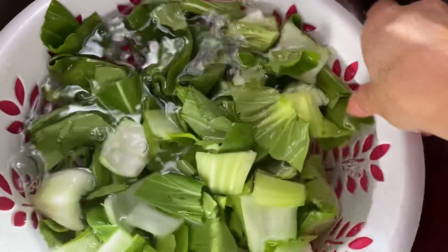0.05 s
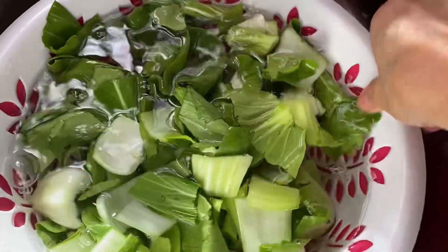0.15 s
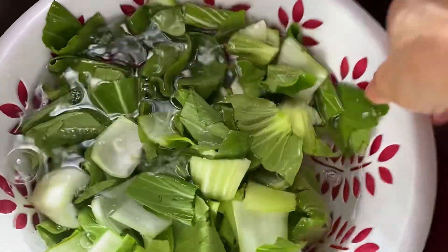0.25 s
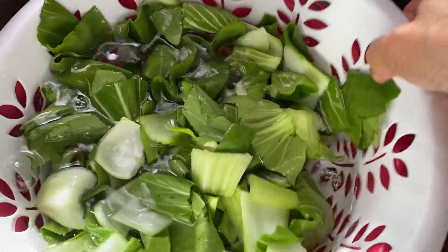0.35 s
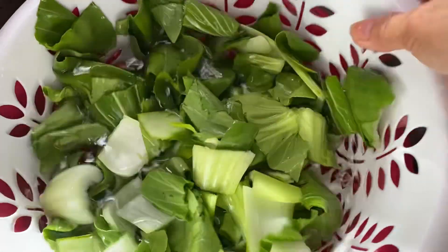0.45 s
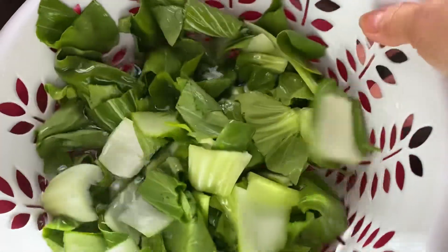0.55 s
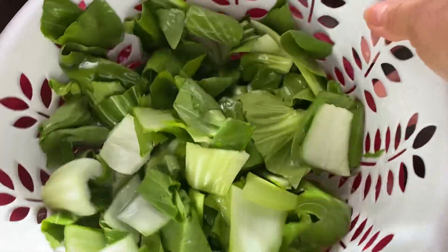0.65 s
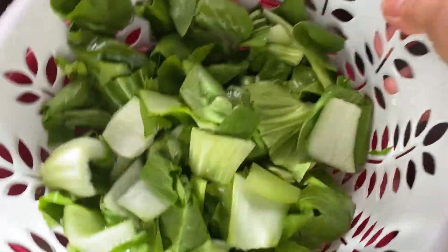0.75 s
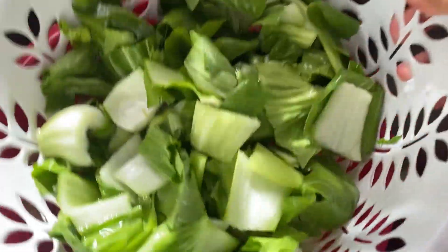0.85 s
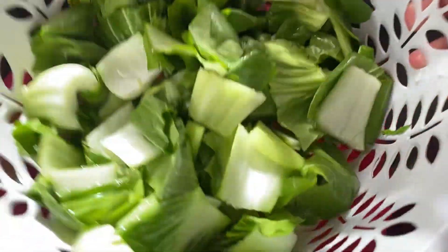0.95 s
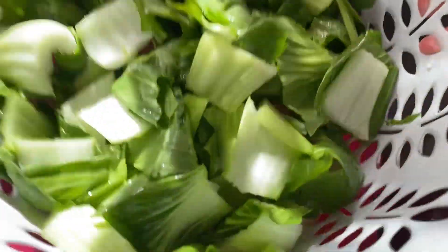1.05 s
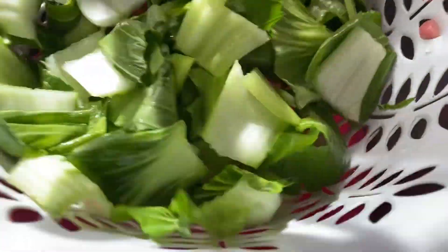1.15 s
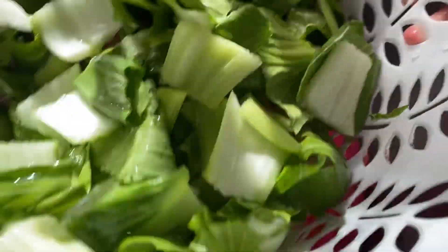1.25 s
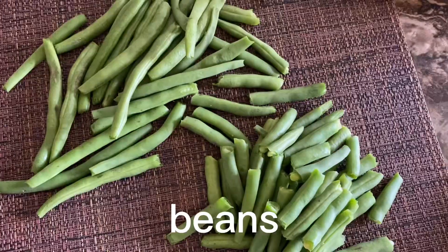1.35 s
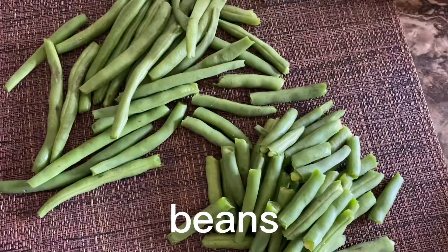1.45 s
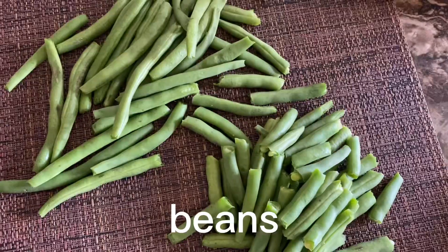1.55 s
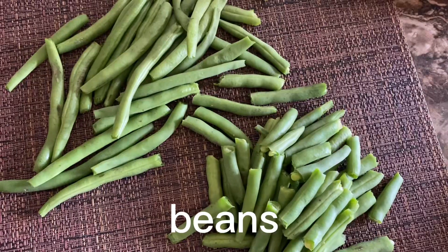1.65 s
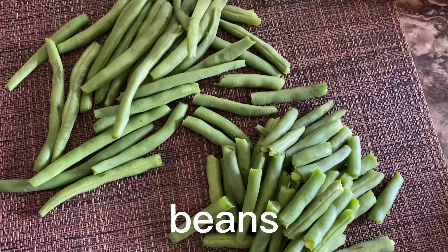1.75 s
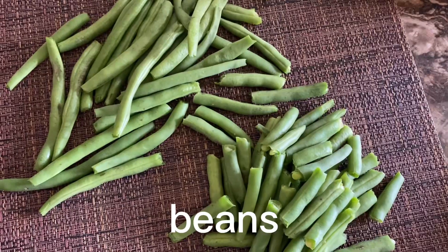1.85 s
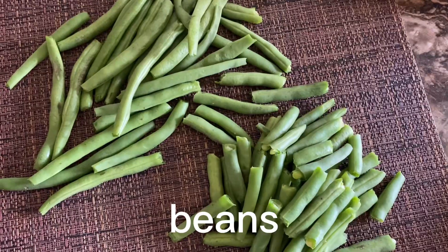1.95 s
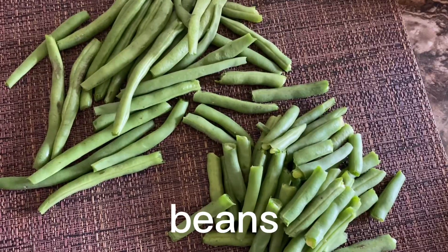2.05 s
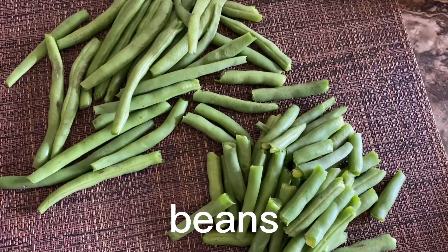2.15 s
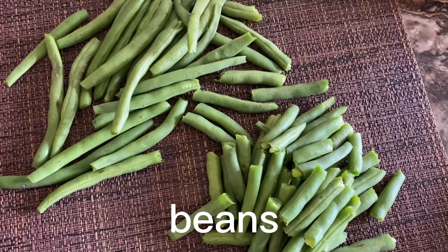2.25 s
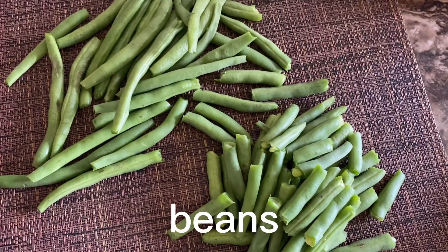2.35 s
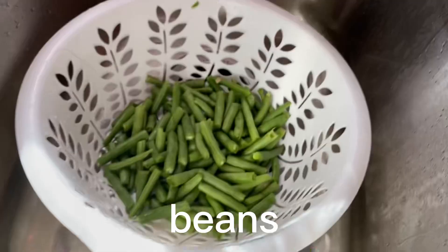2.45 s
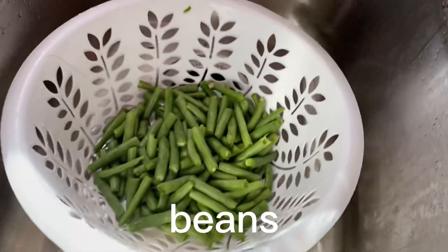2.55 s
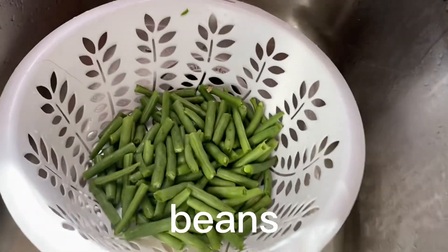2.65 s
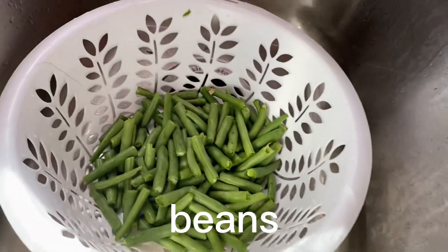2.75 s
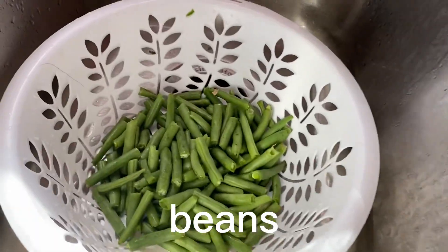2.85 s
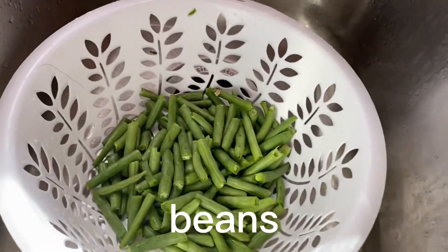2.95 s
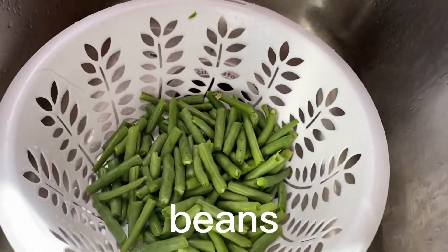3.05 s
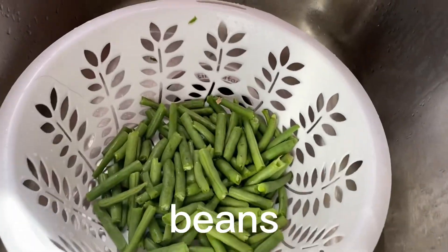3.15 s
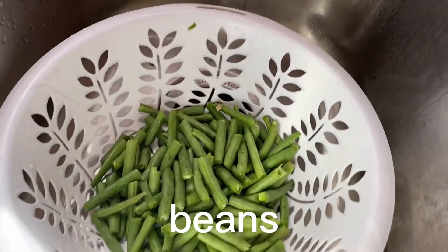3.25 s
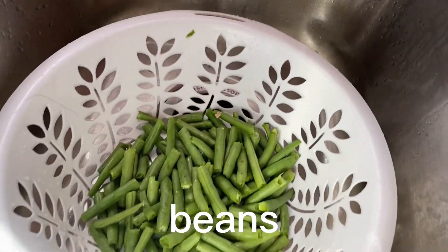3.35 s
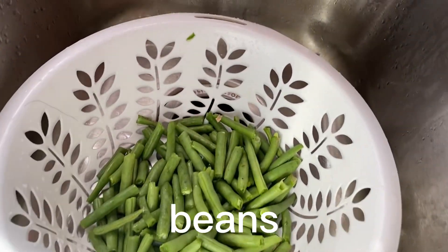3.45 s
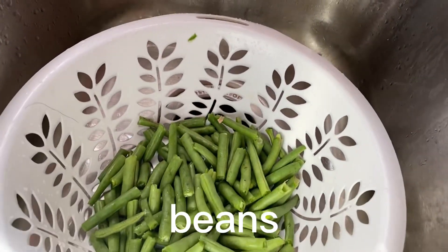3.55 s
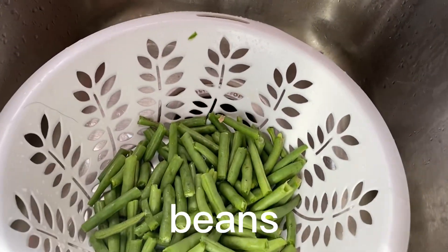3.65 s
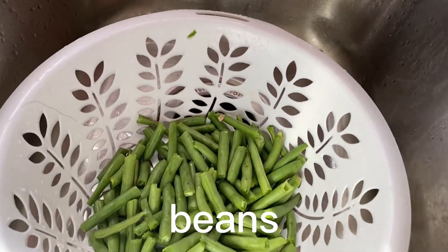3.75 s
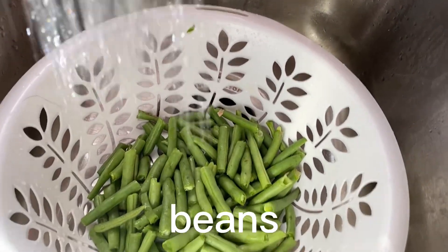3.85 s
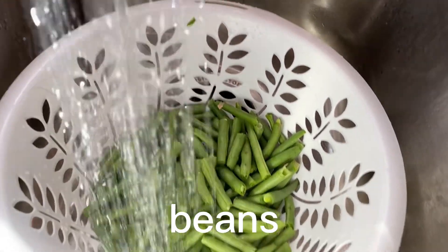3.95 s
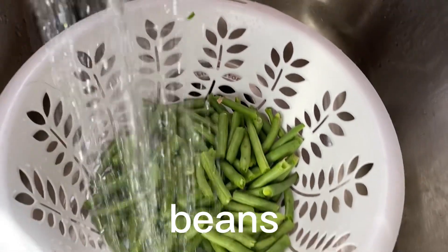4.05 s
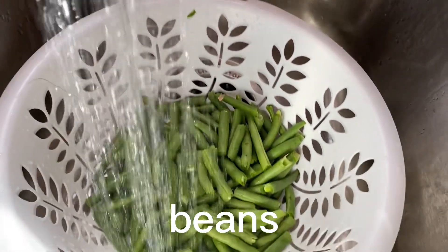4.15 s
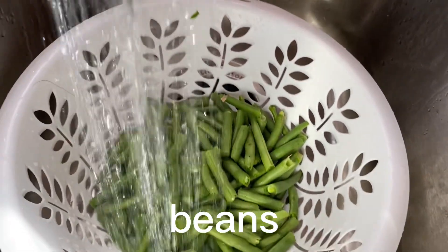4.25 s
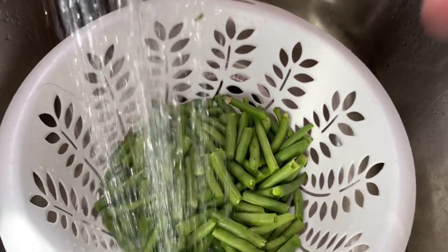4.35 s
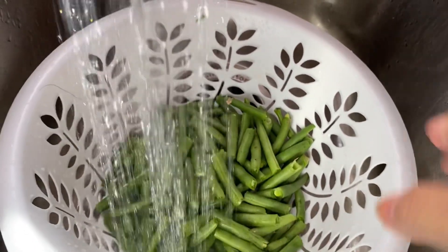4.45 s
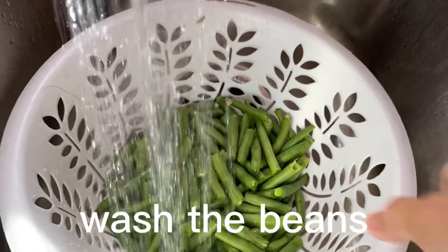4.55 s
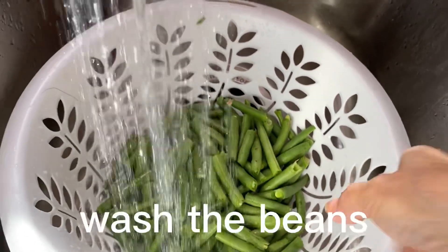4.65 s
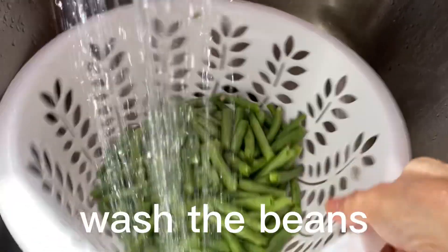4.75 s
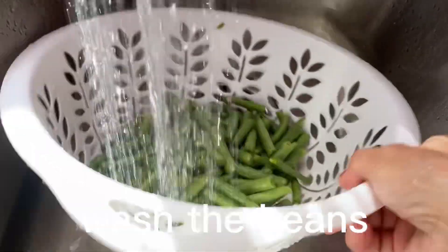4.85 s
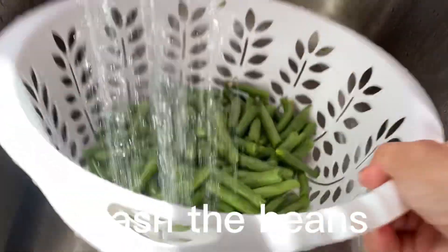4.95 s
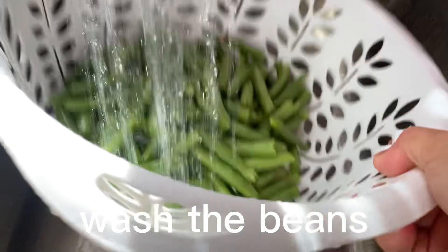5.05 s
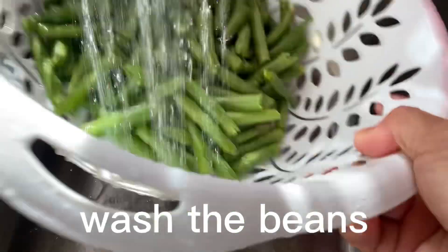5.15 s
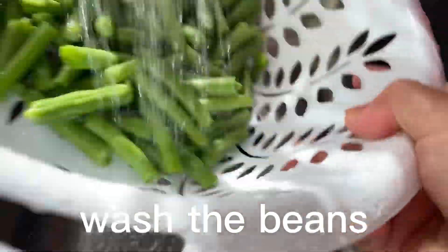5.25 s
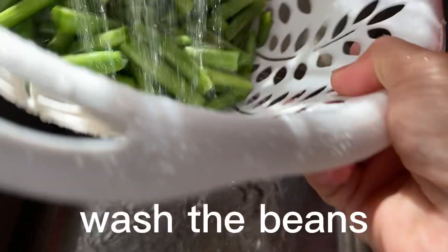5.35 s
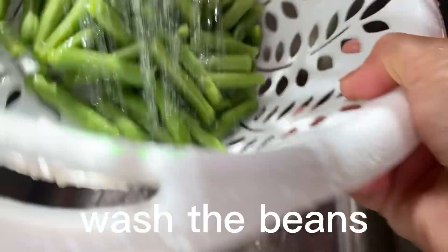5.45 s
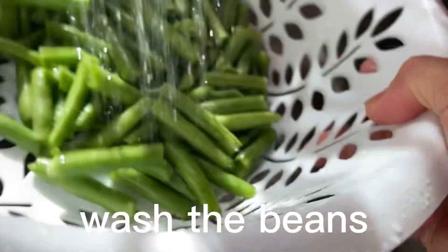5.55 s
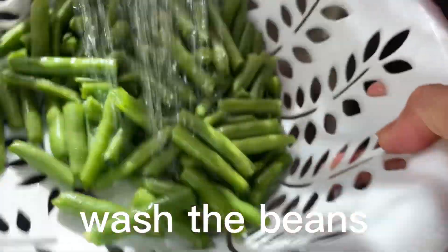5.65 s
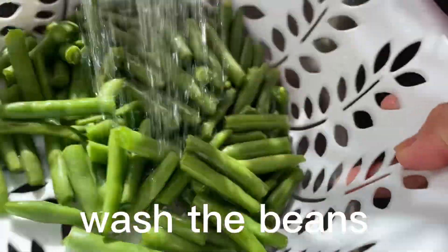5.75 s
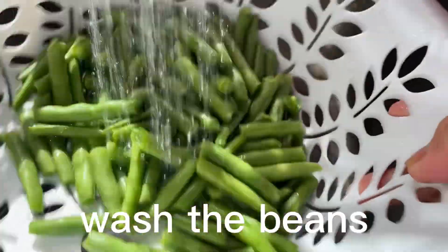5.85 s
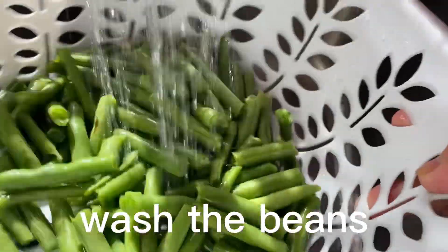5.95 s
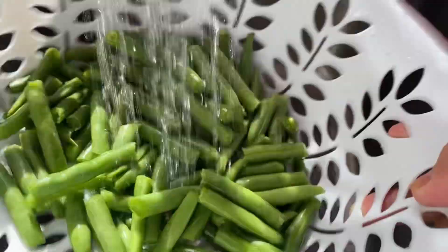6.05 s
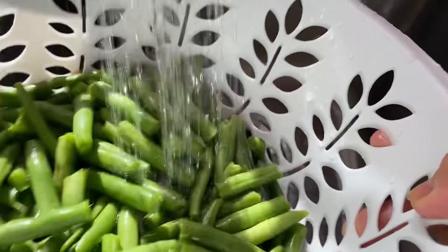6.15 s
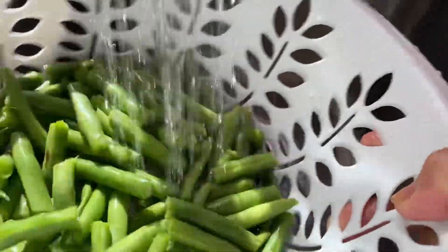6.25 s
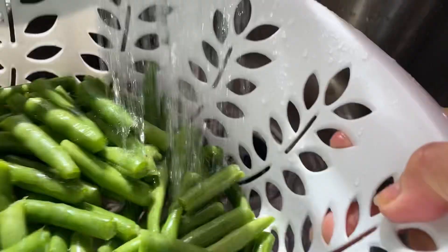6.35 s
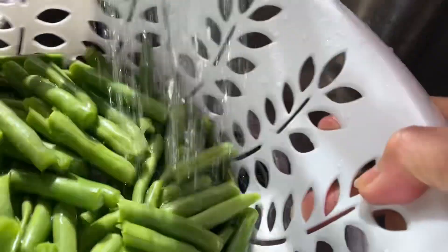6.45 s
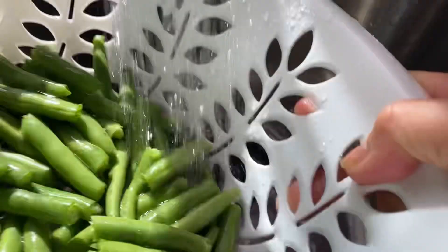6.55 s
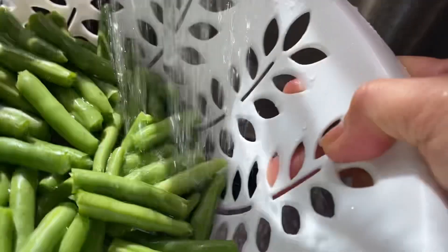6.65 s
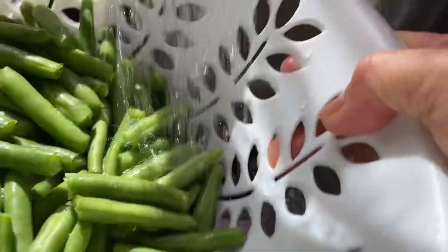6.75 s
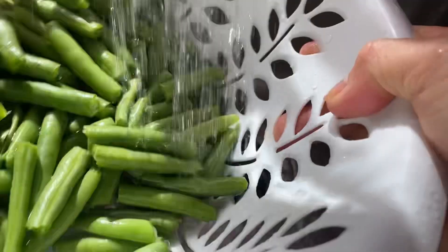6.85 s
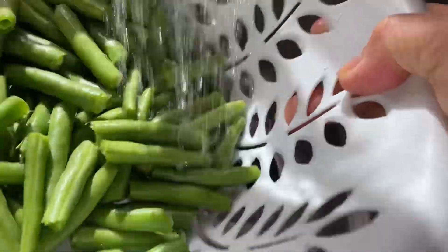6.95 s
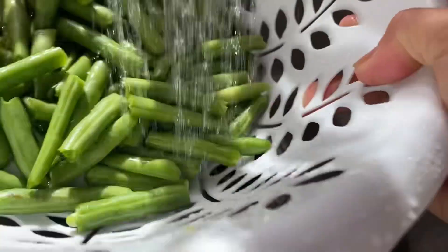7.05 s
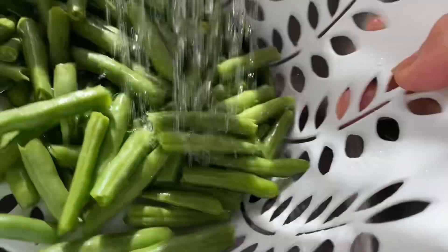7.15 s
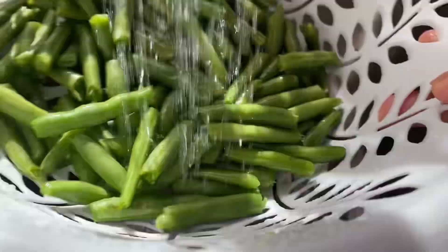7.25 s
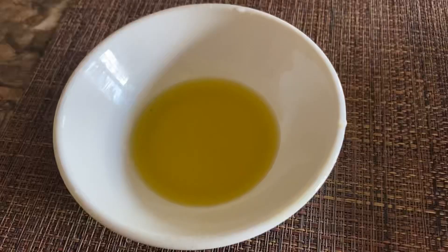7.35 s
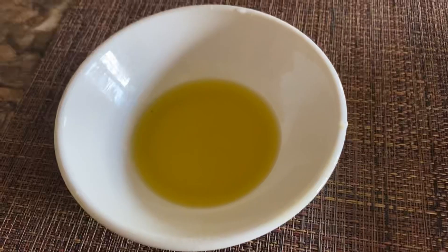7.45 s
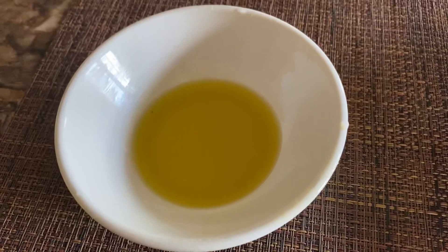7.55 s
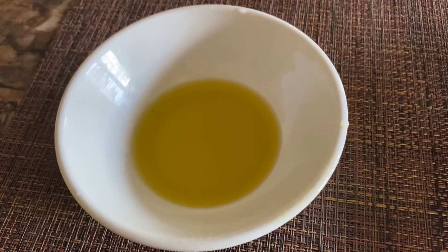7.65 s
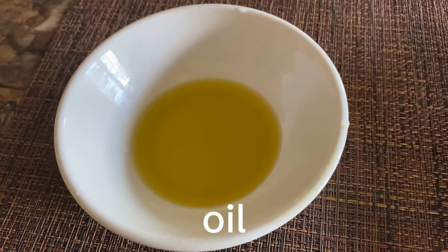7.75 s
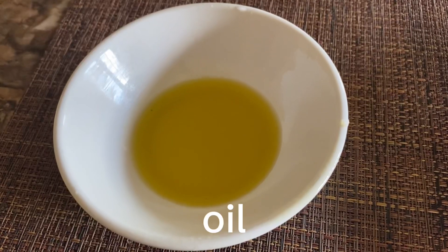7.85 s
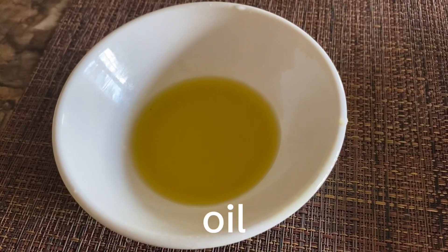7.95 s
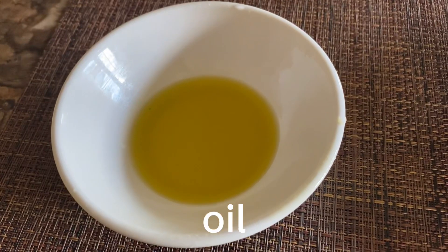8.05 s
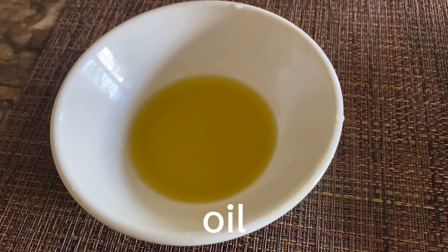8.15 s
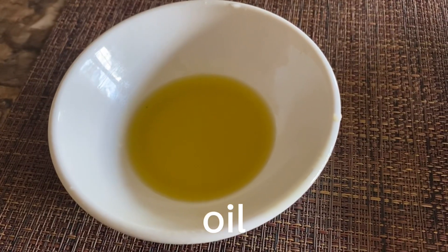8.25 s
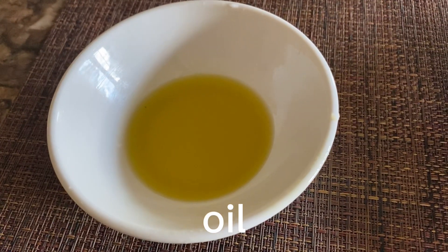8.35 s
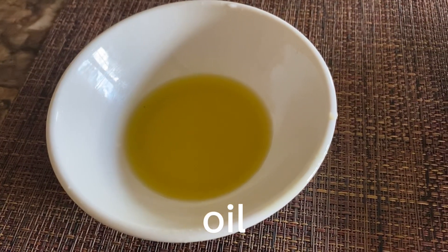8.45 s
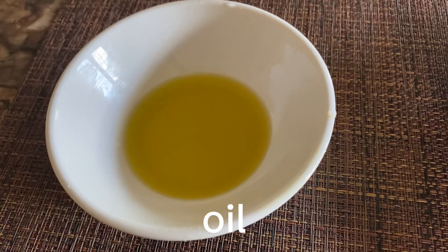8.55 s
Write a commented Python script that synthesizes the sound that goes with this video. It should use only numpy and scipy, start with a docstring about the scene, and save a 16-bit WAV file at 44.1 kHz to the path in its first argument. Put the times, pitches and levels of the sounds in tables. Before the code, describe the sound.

A low mains and refrigerator hum runs throughout, changing tone at each hard cut. From 0 to 0.8 s, a plastic colander gives dull soft thuds while wet leaves slosh and a few drops plink. From about 0.85 s it drains: trickling swells quickly, bubbly pitched gulps crowd together and deepen, peaking around 1.25 s, then cut at 1.35. Hum only, with a light crockery ping at 1.8 s. At 2.5 s the quieter sink room begins, with a slight rustle near 2.8 and faint hiss near 3.2. A tap valve thumps at 3.7, its pipe hissing; spray lands at 3.9 and builds fast. Plastic clacks at 4.5, then a hard steel knock at 4.76. Until 7.3 s, bright hiss sweeps over plastic, beans gurgle and splat, water drums on the basin, and duller knocks boom. It cuts abruptly to faint room hum until 8.5 s.

```python
"""A low kitchen hum comes first, with handled plastic and a trickle, as a colander of leaves is lifted from a bowl.
Four moments are cut one after the other. Drops and ringing air pockets drain from the colander; a dish, a few
damped modes, pings in the quiet room. At the steel sink a spray tap opens over beans: filtered impacts hiss and
drum, bubbles froth, and the colander knocks and is swirled under the jets. Then only the humming room is left."""
import sys
import numpy as np
from scipy import signal
from scipy.fft import rfft, irfft, next_fast_len
from scipy.io import wavfile
from scipy.ndimage import map_coordinates

SR = 44100
rng = np.random.default_rng(int(sys.argv[2]) if len(sys.argv) > 2 else 0)


def put_to_file(sound):
    """Save the sound as 16-bit audio at rate SR, in the file named by the first command-line argument."""
    columns = np.atleast_2d(sound).T  # one column per channel
    safe = np.clip(columns, -1, 1)
    whole_steps = np.round(safe * 32767)
    wavfile.write(sys.argv[1], SR, whole_steps.astype(np.int16))


N = 379252
LIFT_END, SINK_START, SINK_END = 1.349, 2.48, 7.311  # edges of the moments at the bowl and the sink [s]


def amp(db):
    """Decibels to gain."""
    return 10 ** (np.asarray(db) / 20)


def unit(x):
    """Scale to rms 1."""
    return x / np.sqrt(np.mean(x ** 2) + 1e-20)


def clock(length):
    """Sample times over a length in seconds."""
    return np.arange(round(length * SR)) / SR


def along(points, hz):
    """Interpolate (frequency [Hz], value) points on a log frequency axis."""
    f, v = np.transpose(points)
    return np.interp(np.log(hz + 1), np.log(f + 1), v)


def curves(rows):
    """One value per sample for each column after the time."""
    s, *cols = np.transpose(rows)
    return [np.interp(np.arange(N), s * SR, c) for c in cols]


def between(start, end):
    """1 from start to end, with edges of a few milliseconds."""
    t = clock(N / SR)
    return np.clip(np.minimum(t - start, end - t) / .004 + .5, 0, 1)


def ramp(start, length):
    """0 before start, rising evenly to 1 over a length in seconds."""
    return np.clip((clock(N / SR) - start) / length, 0, 1)


def swells(rows):
    """Bell-shaped rises of level, in dB."""
    t = clock(N / SR)
    return sum(db * np.exp(-((t - s) / half) ** 2) for s, half, db in rows)


def wobble(rate):
    """A smooth random curve, rate knots a second."""
    coarse = np.arange(0, N, 32)
    knots = rng.standard_normal(int(N * rate / SR) + 4)
    return np.interp(np.arange(N), coarse, map_coordinates(knots, [coarse * rate / SR]))


def filtered(x, response):
    """x times a response of frequency."""
    n = x.shape[-1]
    m = next_fast_len(n + 8192, True)
    return irfft(rfft(x, m) * response(np.fft.rfftfreq(m, 1 / SR)), m)[..., :n]


def coloured(x, spectrum):
    """x shaped by a spectrum, at rms 1."""
    return unit(filtered(x, lambda hz: amp(along(spectrum, hz))))


def burst(t, hz, octaves):
    """Noise of rms 1 centred on a frequency."""
    noise = rng.standard_normal(len(t))
    return unit(filtered(noise, lambda f: 1 / (1 + (np.log2((f + 1) / hz) / octaves) ** 2)))


def tone(hz, db, waver_db):
    """A motor tone that wavers slightly in level and pitch."""
    level = amp(db + waver_db * wobble(5))
    phase = 2 * np.pi * hz * clock(N / SR) + .55 * wobble(6)
    return level * np.sqrt(2) * np.sin(phase)


def add(track, s, sound):
    """Mix a sound in at time s."""
    part = track[max(round(s * SR), 0):][:len(sound)]
    part += sound[:len(part)]


def patter(rate, spread_db):
    """Impacts at random times and of random sizes, rms 1."""
    hits = np.flatnonzero(rng.random(N) < rate / SR)
    push, size = rng.standard_normal((len(hits), 2)).T
    return unit(np.bincount(hits, push * amp(spread_db * np.clip(size, -2, 2)), N))


def patchy(x, depth_db, width_hz, life):
    """Splashes come in clumps: each stretch of the spectrum flares and fades on its own."""
    hz, t, z = signal.stft(x, SR, nperseg=256)
    rows, cols = np.meshgrid(hz / width_hz, t / life, indexing="ij")
    knots = rng.standard_normal((int(rows.max()) + 3, int(cols.max()) + 3))
    field = np.clip(map_coordinates(knots, [rows, cols], order=2), -2, 2)
    return unit(signal.istft(z * amp(depth_db * field), nperseg=256)[1][:N])


def bubble(t, hz, cycles, rise):
    """An air pocket rings for some cycles, rising in pitch as it nears the surface."""
    age = t * hz / cycles
    glide = 1 + rise * age / (2 + age)
    return np.sin(2 * np.pi * hz * t * glide) * np.exp(-age) * (1 - np.exp(-t * hz))


def froth(start, end, count, hz, octaves, cycles, spread_db):
    """A cloud of small bubbles, randomly timed and pitched from start to end, rms 1."""
    t, n = clock(.02).astype(np.float32), round((end - start) * SR)
    when, size = rng.random((2, count, 1))
    pitch = hz * 2 ** (octaves * rng.standard_normal((count, 1)))
    pitch = np.clip(pitch, 600, 12000).astype(np.float32)
    loudness = amp(-spread_db * np.log(np.maximum(size, .02)))  # size is exponential in dB
    rings = loudness * bubble(t, pitch, float(cycles), rise=.05)
    places = (when * n).astype(int) + np.arange(len(t))
    cloud = np.zeros(N)
    add(cloud, start, unit(np.bincount(places.ravel(), rings.ravel())))
    return cloud


def ring(modes, soft_hz, attack):
    """A struck body of amplitude near 1; a soft contact spares the modes above soft_hz."""
    t, total = clock(0.76), 0
    for hz, db, t60 in modes:
        mode = amp(db - 60 * t / t60) * np.sin(2 * np.pi * hz * t + rng.normal(0, .5))
        total = total + mode / (1 + (hz / soft_hz) ** 4)
    return total * (1 - np.exp(-t / attack))


def echo(x, t60):
    """Diffuse reflections of the same energy as x."""
    t = clock(.4)
    tail = rng.standard_normal(len(t)) * amp(-60 * t / t60) * (t > .001)
    return signal.fftconvolve(x, tail / np.linalg.norm(tail))[:N]


# Air rumble at the bowl and near the dish, at the sink, and afterwards: (frequency [Hz], relative level [dB])
AIR_BOWL = [(20, -36), (35, -21), (52, -3.5), (85, -2.5), (160, -11), (330, -18.5), (450, -23.5),
            (1000, -29.5), (2200, -40.5), (3200, -42.5), (4500, -40.5), (6500, -60), (9000, -63.5),
            (15000, -63)]
AIR_SINK = [(20, -23.5), (48, 3), (95, -1), (160, -9.5), (300, -22), (500, -24), (1400, -31), (2200, -38),
            (4500, -36), (6500, -52.5), (11000, -54), (15000, -58.5)]
AIR_AFTER = [(20, -28), (55, 1), (90, -7), (280, -9), (420, -20), (1000, -26), (2200, -34.5), (4200, -35),
             (6500, -44), (9000, -52), (15000, -59)]
# Edges of the four moments: (time [s])
CUT_TIMES = [-1, LIFT_END, SINK_START, SINK_END, 10]
# The room from each listening place: (air level [dB], mains drone level [dB], drone throb [0-1],
# motor pitch [Hz], motor level [dB], strongest whine level [dB], left minus right [dB])
ROOM_SPOTS = [(-53.5, -39, 0.02, 460, -72, -77, -2), (-51, -51, 0.4, 398, -69, -77.5, -1.8),
              (-52, -59.5, .5, 780, -73, -79, 3), (-57.5, -67, .6, 791, -77.5, -81, -3.5)]
# Thin whines in each moment, strongest first: (pitch [Hz], ...)
WHINE_PITCHES = [
    [3774],
    [3772],
    [3892, 4484],
    [3960, 3564, 4580],
]
# Refrigerator tones heard everywhere: (pitch [Hz], level [dB rms])
FRIDGE_TONES = [(145, -64.5), (200, -68.5), (292, -71.5), (333.8, -75), (526, -77.5), (1135, -83),
                (1415, -83)]
# A soft rustle in the room: (time [s], half length [s], gain [dB])
ROOM_RUSTLE = [(2.81, 0.058, 7.5)]
MAINS_HZ, THROB_HZ = 58.7, 3.4
WHINE_STEP_DB, WHINE_WAVER_DB = 3, 2.2  # each whine is a step weaker than the one before; all waver in level


def room():
    """Air rumble, a refrigerator and a throbbing mains drone, heard from a new spot in each moment."""
    t = clock(N / SR)
    mains = np.sqrt(2) * np.sin(2 * np.pi * MAINS_HZ * t)
    beat = np.cos(2 * np.pi * THROB_HZ * t)
    out = sum(tone(hz, db, waver_db=2.5) for hz, db in FRIDGE_TONES)
    rustle_db = swells(ROOM_RUSTLE)
    colours = [AIR_BOWL, AIR_BOWL, AIR_SINK, AIR_AFTER]
    for start, end, colour, spot, pitches in zip(CUT_TIMES, CUT_TIMES[1:], colours, ROOM_SPOTS, WHINE_PITCHES):
        air_db, drone_db, throb, motor_hz, motor_db, whine_db, _ = spot
        air = amp(air_db + rustle_db) * coloured(rng.standard_normal(N), colour)
        drone = amp(drone_db) * (1 + throb * beat) * mains
        motor = tone(motor_hz, motor_db, waver_db=1)
        whine = sum(tone(hz, whine_db - WHINE_STEP_DB * k, waver_db=WHINE_WAVER_DB)
                    for k, hz in enumerate(pitches))
        out = out + (air + drone + motor + whine) * between(start, end)
    return out


POCKET_CYCLES, POCKET_SWELL_CYCLES = 9.5, 2.6  # how long a pocket rings, and how long it takes to close
SPLASH_DB = -21  # the tearing surface under each pocket's ring


def pocket(t, hz, rise, churn):
    """An air pocket closes with a small splash and rings; churning water blurs its pitch."""
    age = t * hz / POCKET_CYCLES
    clear = np.sqrt(1 - churn) * bubble(t, hz, POCKET_CYCLES, rise)
    blurred = np.sqrt(churn / 2) * burst(t, hz, octaves=0.16) * np.exp(-age)
    splash = amp(SPLASH_DB - 60 * t / .04) * burst(t, hz, octaves=.6)
    return (clear + blurred + splash) * (1 - np.exp(-(t * hz / POCKET_SWELL_CYCLES) ** 2))


# Colour of the crackling trickle: (frequency [Hz], relative level [dB])
TRICKLE_COLOUR = [(200, 2.5), (600, 2.5), (1300, 0.5), (2500, 3), (3400, 0.5), (4500, 2.5), (7000, 0.5),
                  (11000, 0.5), (15500, -0.5)]
# The leaves shift in the colander: (time [s], half length [s], gain [dB])
LEAF_SLOSHES = [(.25, 0.023, 6.5), (.49, 0.015, 6.5), (.59, 0.024, 13), (.875, 0.043, 9), (1.075, 0.024, 4),
                (1.172, 0.006, 4), (1.225, .014, 4), (1.285, 0.013, 5.5)]
# Air pockets ring in the bowl, first single drips, then a crowd of ever larger gulps:
# (time [s], level [dB], pitch [Hz], upward glide [share of the pitch])
BOWL_DRIPS = [(.254, -37, 1070, 0), (.645, -31, 1323, .08), (.683, -37.5, 1030, 0.095),
              (.684, -35, 2870, 0.057), (.703, -35, 1500, 0.17), (.857, -36.5, 1670, 0.18),
              (.882, -39.5, 2700, .1), (.964, -29, 1500, 0.02), (.971, -36, 2300, 0.18),
              (.987, -22.5, 2640, 0.18), (.99, -23.5, 1390, .25), (1.018, -23, 1286, 0.13),
              (1.026, -29, 2080, 0.12), (1.032, -35.5, 3200, .05), (1.042, -35.5, 1950, 0),
              (1.058, -36, 3000, .05), (1.094, -27.5, 3080, .06), (1.104, -32, 2280, 0),
              (1.113, -28, 4300, .1), (1.122, -30, 1440, .1), (1.124, -27.5, 1880, .02),
              (1.163, -22.5, 2290, .08), (1.164, -23, 4030, .1), (1.166, -30, 1450, .05),
              (1.174, -23.5, 1880, .04), (1.187, -27, 2300, 0), (1.197, -27.5, 1026, 0.087),
              (1.198, -24.5, 1865, .04), (1.203, -22.5, 1470, .05), (1.205, -19.5, 1170, .08),
              (1.212, -24.5, 2020, .05), (1.22, -23.5, 948, 0.0046), (1.226, -19, 1604, .04),
              (1.236, -23.5, 910, 0.013), (1.254, -16.5, 2510, 0.085), (1.257, -22.5, 660, .03),
              (1.261, -21.5, 925, .1), (1.275, -26, 1440, .04), (1.277, -17.5, 660, .02),
              (1.279, -24.5, 930, 0), (1.285, -23, 2650, .04), (1.289, -21, 2205, .03),
              (1.291, -22, 1314, .03), (1.297, -27, 885, 0.01), (1.313, -25.5, 943, .03),
              (1.315, -29, 1620, 0.081), (1.323, -17, 613, .02)]
# The trickle, before its mix gain, holds until the lift, swells to a crest and ebbs
TRICKLE_DB, CREST_DB, LIFT_S, CREST_S, EBB_DB_PER_S = -65, -38, 0.85, 1.235, 50.5
SEATED_S, POUR_S = .61, 1.09  # the colander leaves the water; its trickles join into streams
CHURN_ALONE, CHURN_CROWDED = .02, .12  # share of a pocket's ring that is blurred by its neighbours
PATCH_DB = 3.2  # depth of the clumps in falling water


def draining():
    """Water trickles from the rising colander, swells to a crest and ebbs, and gulps as air gets under it."""
    t = clock(.15)
    ebb_db = EBB_DB_PER_S * np.maximum(clock(N / SR) - CREST_S, 0)
    flow_db = TRICKLE_DB + (CREST_DB - TRICKLE_DB) * ramp(LIFT_S, CREST_S - LIFT_S) - ebb_db
    flow_db = flow_db + swells(LEAF_SLOSHES) + 2.0 * wobble(55.23)
    drops = patchy(patter(rate=7000, spread_db=4.5), depth_db=PATCH_DB, width_hz=800, life=.014)
    crackle = coloured(drops, TRICKLE_COLOUR)
    pouring = ramp(POUR_S - .04, 0.091)  # falling streams drive air into the bowl
    bubbles = froth(0, LIFT_END, count=1300, hz=2197, octaves=.6, cycles=11, spread_db=4.5)
    water = amp(flow_db + 5) * (amp(-1.2 * pouring) * crackle + amp(-8 + 1.2 * pouring) * bubbles)
    slosh = coloured(rng.standard_normal(N), [(60, -6), (110, 10.5), (170, 1), (250, 0.0), (600, -1.0),
                                              (900, -15.5), (2000, -23), (6000, -46)])
    # while the colander still sits in the bowl
    water += amp(-52 + 5.7 * wobble(29.7)) * slosh * between(-1, SEATED_S)
    for s, db, hz, rise in BOWL_DRIPS:
        churn = CHURN_CROWDED if s > POUR_S else CHURN_ALONE
        add(water, s, amp(db) * pocket(t, hz, rise, churn))
    return water + amp(-13.5) * echo(water, t60=0.231)


# The plastic colander is bumped and handled: (time [s], level before the thud's trim [dB], pitch [Hz])
PLASTIC_BUMPS = [(.057, -32.5, 233), (.215, -28, 475), (.231, -29.5, 394), (0.275, -32, 213),
                 (.318, -39.5, 718), (.323, -32, 325), (.402, -35.5, 756), (.403, -24.5, 253),
                 (.418, -29.5, 265), (.49, -38, 306), (.582, -32.5, 218), (.592, -33, 600),
                 (4.514, -21, 440), (4.519, -14, 365.3), (4.524, -24.5, 596), (4.555, -21.5, 351),
                 (4.568, -25.5, 100), (4.665, -20.5, 170), (4.72, -20, 331), (6.372, -25, 60)]
THUD_NOISE_DB = -5  # the dull puff under each thud's note


def bumps():
    """Dull, brief thuds of the plastic: a decaying note over a puff of noise."""
    out, t = np.zeros(N), clock(.15)
    for s, db, hz in PLASTIC_BUMPS:
        noise = rng.standard_normal(len(t))
        puff = unit(filtered(noise, lambda f: 1 / (1 + (np.log2((f + 1) / hz) / .6) ** 4)))
        note = np.sqrt(2) * np.sin(2 * np.pi * hz * t)
        envelope = amp(db - 10.5 - 60 * t / 0.18) * (1 - np.exp(-t / 0.0013))
        add(out, s, envelope * (amp(THUD_NOISE_DB) * puff + note))
    return out


# Single drops that hit the plastic: (time [s], level before the drop's trim [dB], centre [Hz])
PLASTIC_DROPS = [(.193, -38, 1100), (.193, -32, 2820), (.26, -47, 8000), (.353, -38, 3700),
                 (0.401, -32, 2080), (.492, -49, 7000), (0.601, -35.5, 2870), (0.659, -43, 8500),
                 (.6828, -35.5, 1560), (.8, -36.5, 8850), (.87, -40, 7000), (.927, -39, 5500),
                 (.993, -32, 11000), (1.063, -29.5, 6000), (1.119, -28, 4600), (1.145, -28, 6200),
                 (1.163, -24, 6000), (1.175, -24.5, 5000), (1.21, -21, 5800), (1.226, -17.5, 8000),
                 (1.256, -18.5, 8000), (3.917, -33, 8000), (3.951, -22, 9000), (3.981, -17, 12000),
                 (4.1505, -13.5, 14000), (4.331, -17, 11000), (4.356, -14, 13500), (4.363, -10, 10300),
                 (4.4, -16, 10700), (4.504, -13, 10000), (4.541, -11.5, 8560), (4.5527, -11.5, 12970),
                 (4.574, -23, 2240), (4.612, -12, 9600), (4.671, -14.5, 9100), (5.04, -12, 10900),
                 (5.4723, -8.5, 6420), (5.618, -15, 9000), (5.632, -14.5, 6710), (5.724, -17, 6670),
                 (5.849, -18, 9000), (5.981, -15.5, 7000), (6.009, -13, 10500), (6.022, -15.5, 6300),
                 (6.104, -11.5, 10280), (6.162, -16.5, 7000), (6.2495, -18, 3980), (6.288, -15.5, 11000),
                 (6.443, -14.5, 9000), (6.6077, -13, 8100), (6.737, -12, 8100), (6.872, -17, 7500),
                 (7.094, -17, 7040), (7.102, -13, 11000), (7.182, -15, 10900), (7.2694, -14, 7500)]


def drops_on_plastic():
    """Sharp noise bursts; smaller drops are brighter and briefer."""
    out, t = np.zeros(N), clock(.06)
    for s, db, hz in PLASTIC_DROPS:
        t60 = 0.023 * np.sqrt(6000 / hz)
        add(out, s, amp(db - 5.5 - 60 * t / t60) * burst(t, hz, octaves=0.63))
    return out


# Modes of the crockery: (frequency [Hz], relative level [dB], 60 dB decay [s])
DISH_MODES = [(2138, 0, 0.1), (2143, -12, 0.29), (2220, -14, .08), (5180, -14.5, 0.08), (5600, -22, 0.05),
              (7980, -18, 0.076), (9170, 2.5, 0.024), (9230, -9, 0.068), (10750, -16, .04),
              (11280, -19, 0.046), (12850, -20, .04)]
DISH_S = 1.8028
CRACK_DB = -48  # the dry tick of the contact
DISH_ROOM_DB, DISH_ROOM_T60_S = -17, .3


def dish():
    """A light tap on crockery: modes ring with a dry tick, and the room answers."""
    ping = np.zeros(N)
    add(ping, DISH_S, amp(-34.5) * ring(DISH_MODES, soft_hz=18000, attack=0.00039))
    t = clock(.02)
    add(ping, DISH_S, amp(CRACK_DB - 60 * t / 0.013) * burst(t, hz=6500, octaves=1.1))
    return ping + amp(DISH_ROOM_DB) * echo(ping, t60=DISH_ROOM_T60_S)


# A faint, high hiss before the tap opens: (time [s], half length [s], level [dB])
HISS_BEFORE_TAP = (3.2, 0.24, -72)


def faint_hiss():
    """A brief, soft hiss at the sink: filtered noise under a bell-shaped envelope."""
    s, half, db = HISS_BEFORE_TAP
    hiss = coloured(rng.standard_normal(N), [(1000, -3), (5000, 0), (8000, -5), (15000, -4)])
    return hiss * amp(db) * np.exp(-((clock(N / SR) - s) / half) ** 2)


# Modes of the pipe: (frequency [Hz], relative level [dB], 60 dB decay [s])
VALVE_MODES = [(124.3, 0, 0.9), (215, -12, 0.31), (291.3, -13, 0.27), (409, -13.5, 0.23), (526, -19, 0.14)]
# Colour of the pipe's hiss: (frequency [Hz], relative level [dB])
PIPE_COLOUR = [(100, 24), (340, 21), (415, 27), (500, 11.5), (900, 6), (2000, 3), (2330, 10), (2700, -1),
               (4300, 1), (5200, 4), (5900, -4), (6700, -1.5), (11000, -4.5), (15000, -9)]
VALVE_S, JETS_S, BUILD_S, BUILD_DB = 3.675, 3.91, 0.099, 12.5  # the tap opens, the jets land and build to full flow


def tap():
    """The valve thumps as it opens and the pipe hisses ever louder until the jets land."""
    pipe = np.zeros(N)
    add(pipe, VALVE_S, amp(-21.5) * ring(VALVE_MODES, soft_hz=903, attack=0.0041))
    pipe *= amp(-14 * between(3.755, SINK_END))  # flowing water damps the pipe
    t = clock(.06)
    spurt = amp(-48.5 - 60 * t / 0.059) * burst(t, hz=2400, octaves=1.8)
    add(pipe, VALVE_S - .006, spurt)
    hiss = coloured(rng.standard_normal(N), PIPE_COLOUR) * amp(-47 + 4.2 * ramp(VALVE_S, JETS_S - VALVE_S))
    return pipe + hiss * ramp(VALVE_S - .045, 0.059) * between(SINK_START, JETS_S + BUILD_S)


# Runoff drumming on the basin, at full flow: (time [s], level [dB])
RUNOFF_LEVEL = [(4.0, -43), (4.7, -38), (4.9, -37), (5.02, -43), (5.22, -40.5), (5.52, -38.5),
                (6.73, -36.5), (7.0, -40), (7.3, -40.5)]
# The jets sweep over bare plastic and hiss louder: (time [s], half length [s], gain [dB])
JET_SWEEPS = [(5.485, 0.02, 2.5), (5.66, 0.051, 4), (6.12, 0.045, 2.5), (6.32, 0.095, 4.5),
              (6.495, 0.025, 9), (6.765, 0.07, 4.5), (6.9, .02, 4.5), (7.09, 0.015, 7), (7.295, 0.0093, 1)]
JET_DB = -36.5  # base of the hiss, before its mix gain
# gurgle of the beans at rest, and once picked up, before its mix gains
STILL_DB, TUMBLE_DB, PICKUP_S, SETTLE_DB_PER_S = -41.5, -36.5, 4.72, 1.5


def spray_levels():
    """Levels in dB of hiss, gurgle and drumming: the flow builds and holds; picked-up beans tumble, then settle."""
    flow_db = BUILD_DB * (ramp(JETS_S, BUILD_S) - 1)
    held = ramp(PICKUP_S, 0.055)
    settling_db = SETTLE_DB_PER_S * np.maximum(clock(N / SR) - PICKUP_S, 0)
    tumble_db = TUMBLE_DB - settling_db + 1.6 * wobble(22)
    hiss_db = JET_DB + swells(JET_SWEEPS) + 0.58 * wobble(20)
    gurgle_db = STILL_DB + held * (tumble_db - STILL_DB)
    drum_db = curves(RUNOFF_LEVEL)[0] + 1.4 * wobble(16)
    return flow_db + hiss_db, flow_db + gurgle_db, flow_db + drum_db


# The colander is in a new place at each of these: (time [s])
MOVE_TIMES = [0, 4.7, 5.0, 5.3, 5.7, 6.1, 6.5, 6.9, 7.3]
WALLS_DB, WALLS_T60_S = -10, .04  # the steel walls close around the jets


def walled(x):
    """Close reflections comb the sound; the pattern shifts as the colander moves."""
    t = clock(N / SR)
    shares = [np.sqrt(np.interp(t, MOVE_TIMES, place)) for place in np.eye(len(MOVE_TIMES))]
    return unit(x + amp(WALLS_DB) * sum(share * echo(x, WALLS_T60_S) for share in shares))


# Colours of the jets, the wet beans and the basin: (frequency [Hz], relative level [dB])
JET_COLOUR = [(300, -7), (900, -9.5), (2000, -12), (3500, -2), (6500, -3.5), (11000, -0.5), (15500, -2)]
GURGLE_COLOUR = [(400, -16), (800, -3), (1400, 1.5), (2900, 1), (4500, -10.5), (7000, -25.5),
                 (12000, -40.5)]
BASIN_COLOUR = [(35, -52), (60, -36), (92, -18), (134, -10), (166, -12.5), (204, -1), (238, -3), (280, -7),
                (380, -9), (486, -15.5), (591, -15.5), (800, -30.5), (1040, -59), (1760, -120)]
# Modes of the steel sink, also struck in knocks(): (frequency [Hz], relative level [dB], 60 dB decay [s])
SINK_MODES = [(79, -22.5, 0.22), (155.5, -17, 0.33), (202.2, -8, 0.5), (216.2, -14.5, 0.74),
              (242.6, -7, .2), (278.4, 1, 0.16), (337.4, -3, 0.15), (377.7, -10, 0.26), (450, -19, 0.23),
              (522.5, -1, 0.16), (586, -13, 0.55), (675, -26, 0.38), (872, -27.5, .25), (1046, -19, .1),
              (1177, -22, .1), (1244, -22, 0.2), (2714, -19, .12)]


def spray():
    """Jets hiss on the colander, froth among the beans and drum on the basin."""
    hiss_db, gurgle_db, drum_db = spray_levels()
    swirl = ramp(PICKUP_S, 0.303)  # tumbling beans open gaps that trap air
    streams = patchy(patter(rate=16000, spread_db=4.0), depth_db=PATCH_DB, width_hz=426.3, life=.018)
    jets = coloured(walled(streams), JET_COLOUR) * amp(hiss_db + 5 + 1.5 * wobble(170))
    fine_bubbles = froth(3.9, SINK_END, count=1500, hz=8015, octaves=.25, cycles=24, spread_db=4.0)
    fizz = amp(hiss_db - 6.5) * fine_bubbles
    trickles = patchy(patter(rate=3500, spread_db=1.0), depth_db=PATCH_DB, width_hz=260, life=.02)
    wash = coloured(trickles, GURGLE_COLOUR) * amp(0.84 * wobble(70))
    bubbles = froth(3.9, SINK_END, count=2000, hz=2607, octaves=.45, cycles=9, spread_db=2.2)
    beans = amp(gurgle_db) * (amp(-3.5) * wash + amp(-10.5 + 4.1 * swirl) * bubbles)
    runoff = patter(rate=980, spread_db=0.0)
    steel = unit(signal.fftconvolve(runoff, ring(SINK_MODES, soft_hz=289.0, attack=0.0007))[:N])
    basin = coloured(patter(rate=900, spread_db=1.0), BASIN_COLOUR)
    drum = amp(drum_db) * (amp(-1) * basin + amp(-5.5) * steel)
    fat_drops = coloured(patter(rate=120, spread_db=1.5), GURGLE_COLOUR)
    spatter = amp(gurgle_db - 11) * fat_drops  # they slap the beans
    return (jets + fizz + spatter + beans + drum) * between(3.915, SINK_END)


# The colander meets the sink: (time [s], level [dB], hardness as cut-off [Hz])
SINK_KNOCKS = [(4.764, -7, 2500), (4.786, -19, 300), (5.423, -21, 280), (5.47, -20.5, 280),
               (5.764, -22.5, 280), (6.08, -21.5, 205), (6.2, -25, 210), (6.492, -16, 245),
               (6.63, -27.5, 300), (6.675, -22, 270), (6.738, -14.5, 240), (6.787, -19.5, 220),
               (6.868, -24, 340), (7.143, -22.5, 220)]


def knocks():
    """The colander strikes the sink, which booms in its low modes."""
    out = np.zeros(N)
    for s, db, hz in SINK_KNOCKS:
        add(out, s, amp(db) * ring(SINK_MODES, soft_hz=hz, attack=0.0024))
    t, hardest = clock(.3), SINK_KNOCKS[0][0]
    jolt = amp(-21.5 - 60 * t / 0.17) * burst(t, hz=1360, octaves=1.43)
    add(out, hardest, jolt)  # the hardest blow jolts the beans
    shake = amp(-23.0 - 60 * t / 0.26) * np.sin(2 * np.pi * 58 * t)
    add(out, hardest, shake)  # and shakes the whole counter
    return out


# A jet breaks into a wet gap between beans:
# (time [s], level before the splat's trims [dB], pitch [Hz], 60 dB decay of the slap [s])
BEAN_SPLATS = [(4.976, -28, 3100, 0.099), (4.992, -22.5, 3030, 0.13), (5.047, -25, 2450, 0.11),
               (5.136, -22, 3040, 0.035), (5.147, -25.5, 1603, 0.056), (5.176, -21, 2920, 0.035),
               (5.236, -15.5, 2630, 0.033), (5.242, -21, 3700, 0.027), (5.326, -21.5, 2930, 0.038),
               (5.336, -19, 3260, 0.032), (5.366, -19, 4380, 0.043), (5.388, -22, 2320, 0.032),
               (5.403, -19.5, 3150, 0.045), (5.5, -18, 4870, 0.056), (5.5263, -15, 2800, 0.037),
               (5.624, -17.5, 2760, 0.034), (5.649, -17.5, 3330, .045), (5.683, -16.5, 3520, 0.063),
               (5.865, -18, 4050, 0.042), (5.952, -19.5, 2266, 0.045), (6.007, -15, 2940, 0.036),
               (6.116, -21, 2880, 0.045), (6.184, -17, 3360, 0.04), (6.304, -20, 4400, 0.031),
               (6.319, -17.5, 4370, .04), (6.35, -19, 3160, 0.026), (6.3508, -12, 4920, 0.044),
               (6.4416, -18.5, 3330, .04), (6.491, -20, 2520, 0.027), (6.634, -20.5, 2065, 0.02),
               (6.697, -21, 3000, .025), (6.758, -15, 3254, 0.024), (6.898, -16.5, 4045, 0.03),
               (7.066, -21.5, 2414, .04), (7.088, -17, 4930, 0.045), (7.2155, -9, 3830, 0.026),
               (7.22, -9.5, 3030, 0.026), (7.221, -26, 1490, 0.036)]


def splats():
    """Wet slaps of narrow noise that each trap a ringing bubble."""
    out, t = np.zeros(N), clock(.06)
    for s, db, hz, t60 in BEAN_SPLATS:
        slap = amp(db - 3.5 - 60 * t / t60) * burst(t, hz, octaves=0.3)
        trapped = amp(db - 6.5) * bubble(t, hz, cycles=20.2, rise=0.06)
        add(out, s, (slap + trapped) * (1 - np.exp(-t / 0.0023)))
    return out


# How alike the two channels are: (frequency [Hz], likeness [0-1])
CHANNEL_LIKENESS = [(60, .96), (300, .93), (560, .62), (800, .42), (1400, .45), (3000, .36), (5500, .35),
                    (6800, .85), (8400, .997), (15000, .997)]


def stereo(x, twist, t60, roam):
    """Reflections make the channels differ, drifting in time for a roaming source; alike treble is turned in phase."""
    size = next_fast_len(N + 8192, True)
    hz = np.fft.rfftfreq(size, 1 / SR)
    turn = np.arccos(np.clip(along(CHANNEL_LIKENESS, hz), -1, 1)) / 2
    half = np.exp(.5j * np.pi * np.interp(hz, *np.transpose(twist)))  # half the twist for each channel
    walls = echo(x, t60) * np.sqrt(2) * np.cos(np.pi / 4 + roam * wobble(6.2))
    mid, side = rfft(x, size) * np.cos(turn), rfft(walls, size) * np.sin(turn)
    return irfft(np.array([(mid + side) * half, (mid - side) / half]), size)[:, :N]


def panned(db):
    """Left and right gains for a level difference."""
    return amp(np.array([db, -db]) / 2)


# Phase between the channels in the treble, at the bowl and at the sink: (frequency [Hz], phase [half turns])
BOWL_TWIST = [(6500, 0), (8400, -.95), (9700, -1.05), (11300, -1.9), (13000, -2.1), (14500, -2.95),
              (15800, -3.05)]
SINK_TWIST = [(7300, 0), (8500, -.97), (9450, -1.03), (10400, -1.95), (11600, -2.05), (12750, -2.97),
              (13600, -3.03), (14600, -3.95)]
# Lean of the sink's sound to one side: (frequency [Hz], left minus right [dB])
SINK_BALANCE = [(60, 0), (200, 2), (380, 2.5), (520, .5), (700, 0), (3000, .3), (8000, 0)]
BOOM_ROOM_DB, BOOM_ROOM_T60_S = -12, .2  # the kitchen's answer to the knocks


def scene():
    """Each moment is cut off by the next."""
    contacts = bumps() + drops_on_plastic() + splats()
    at_sink = between(SINK_START, SINK_END)
    bowl = (draining() + contacts) * between(-1, LIFT_END)
    water = (faint_hiss() + tap() + spray() + contacts) * at_sink
    boom = knocks()
    answer = np.array([echo(boom, BOOM_ROOM_T60_S), echo(boom, BOOM_ROOM_T60_S)])
    boom = boom + amp(BOOM_ROOM_DB) * answer
    moments = zip(CUT_TIMES, CUT_TIMES[1:], ROOM_SPOTS)
    pan_db = sum(spot[-1] * between(start, end) for start, end, spot in moments)
    kitchen = stereo(bowl + room(), BOWL_TWIST, t60=0.071, roam=0.45) * panned(pan_db)
    sink = stereo(water, SINK_TWIST, t60=0.094, roam=2.43) + boom * at_sink
    return kitchen + filtered(sink, lambda hz: panned(along(SINK_BALANCE, hz))) + dish()


LOW_CUT_HZ, TOP_HZ = 31.5, 15900


def record(dry):
    """The microphone drops the deepest bass, and nothing is kept above the band limit."""
    def response(hz):
        """Low cut times a steep upper band edge."""
        low_cut = hz ** 4 / (hz ** 4 + LOW_CUT_HZ ** 4)
        return low_cut * np.clip((TOP_HZ - hz) / 400 + .5, 0, 1)
    return filtered(dry, response)


dry = scene()
out = record(dry)
put_to_file(out)
```